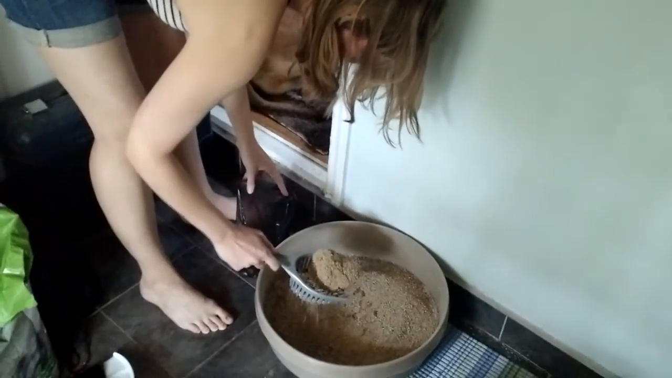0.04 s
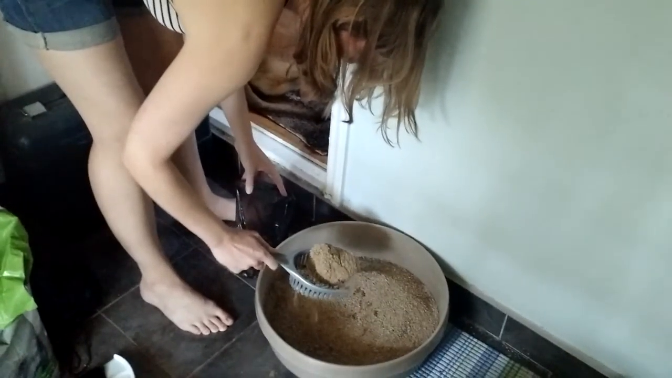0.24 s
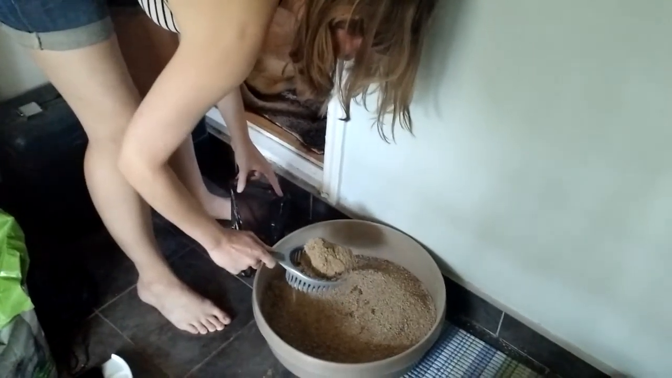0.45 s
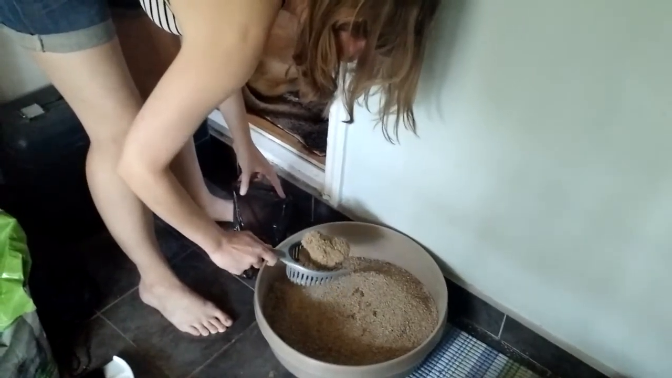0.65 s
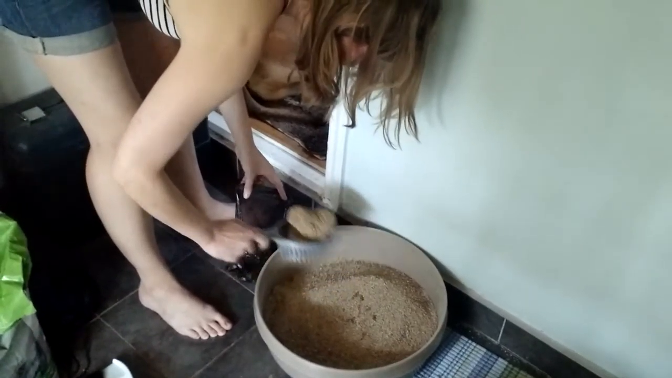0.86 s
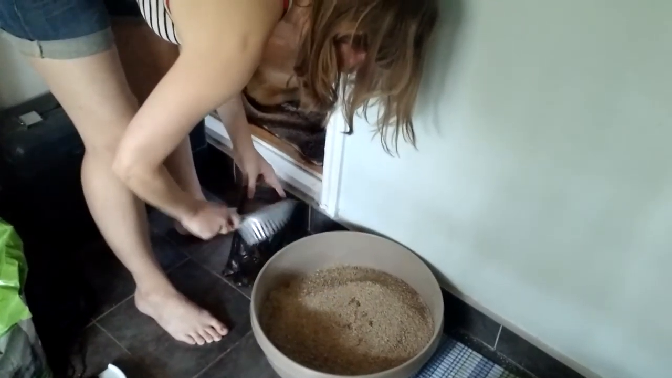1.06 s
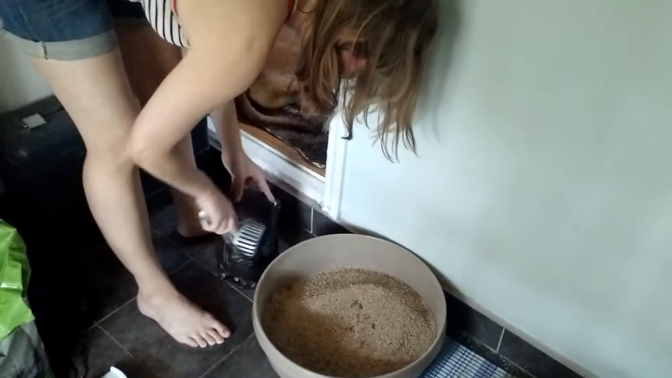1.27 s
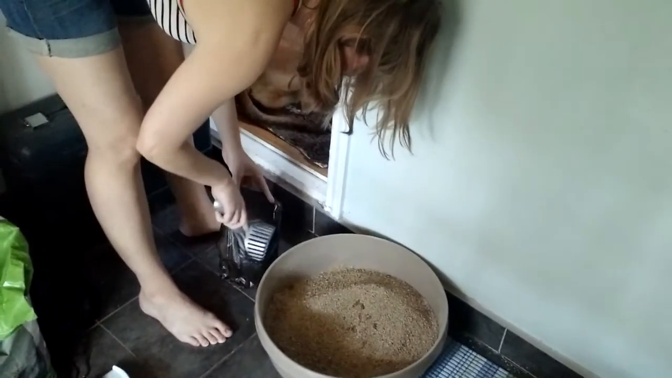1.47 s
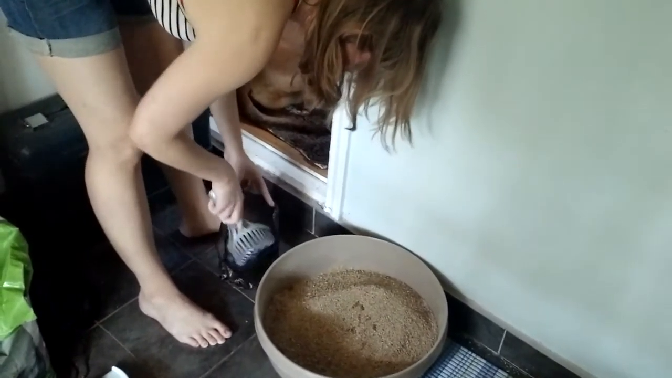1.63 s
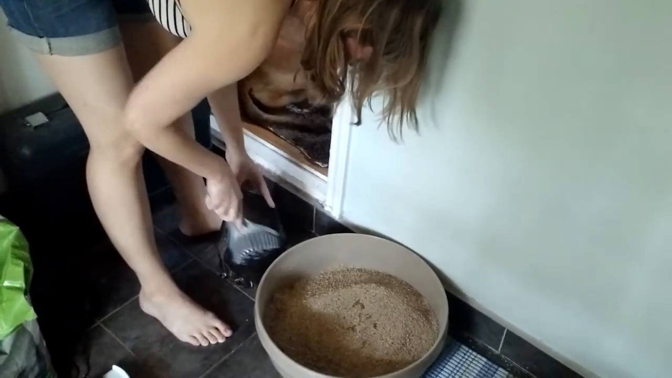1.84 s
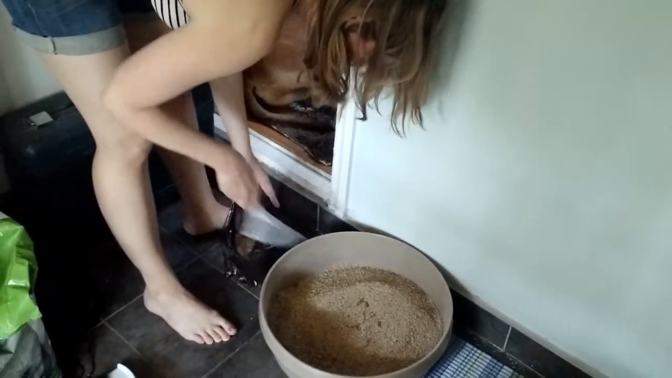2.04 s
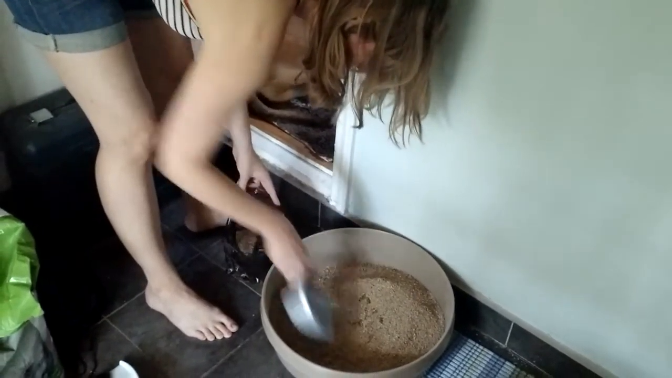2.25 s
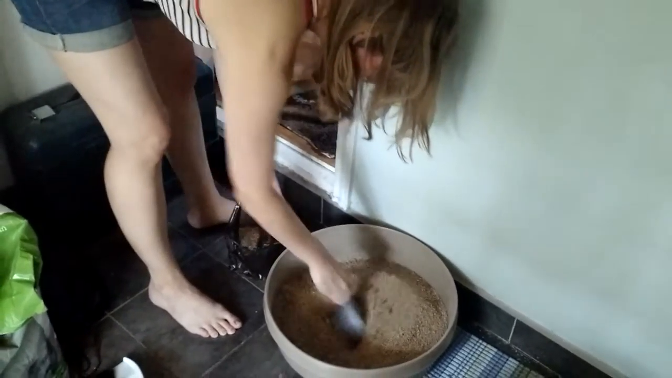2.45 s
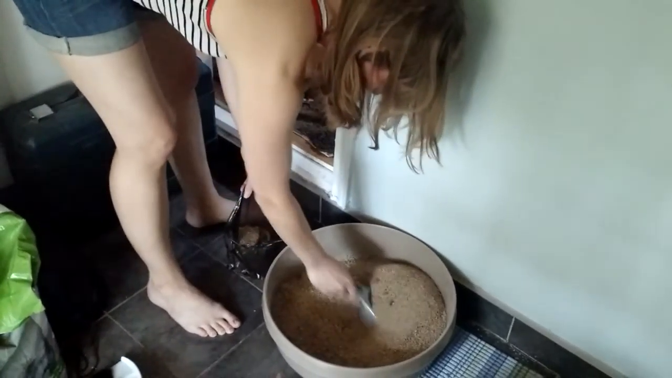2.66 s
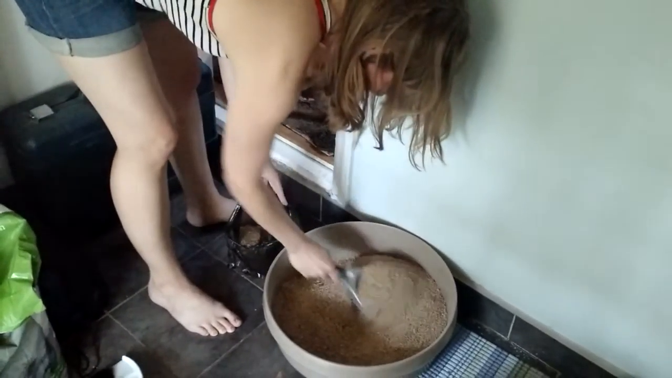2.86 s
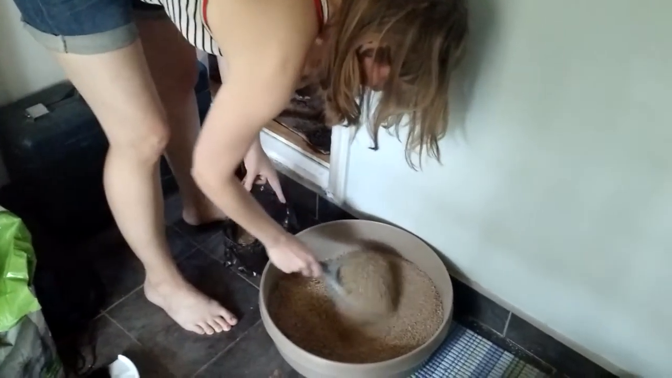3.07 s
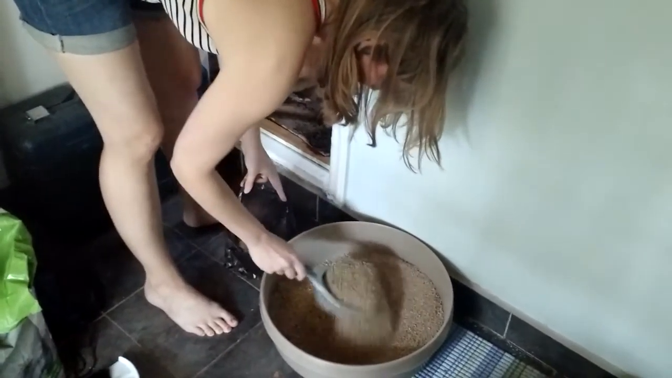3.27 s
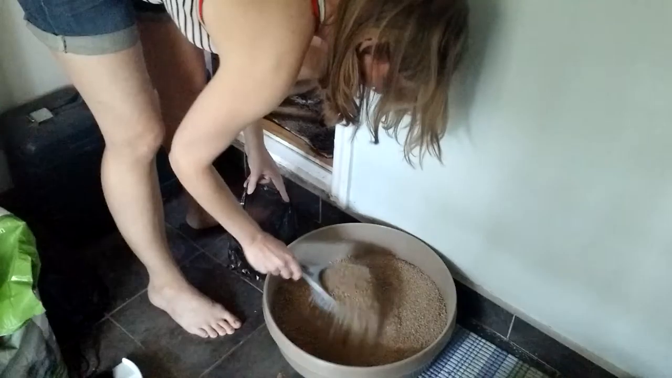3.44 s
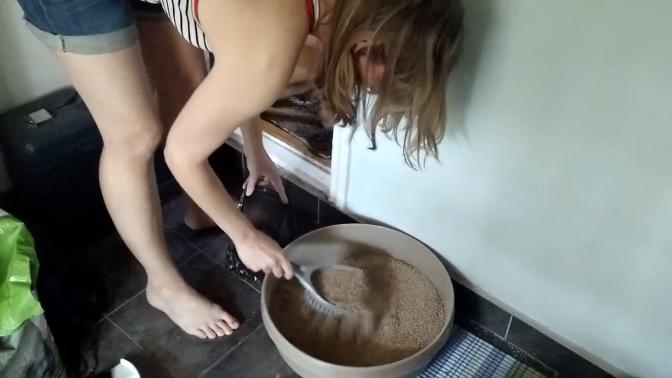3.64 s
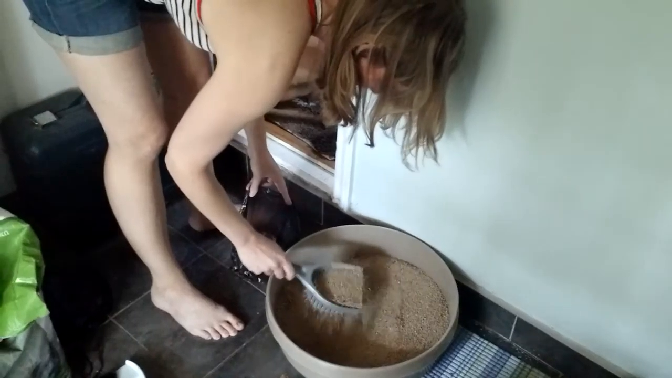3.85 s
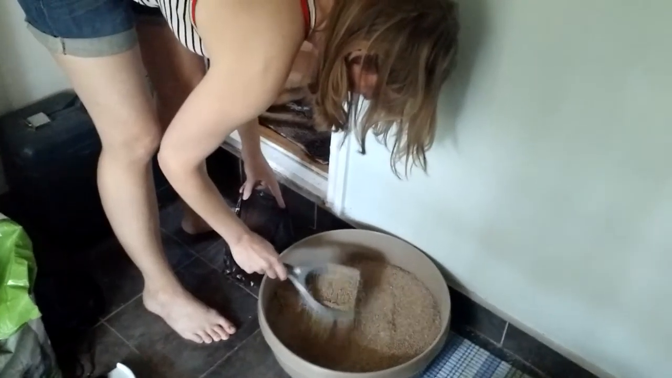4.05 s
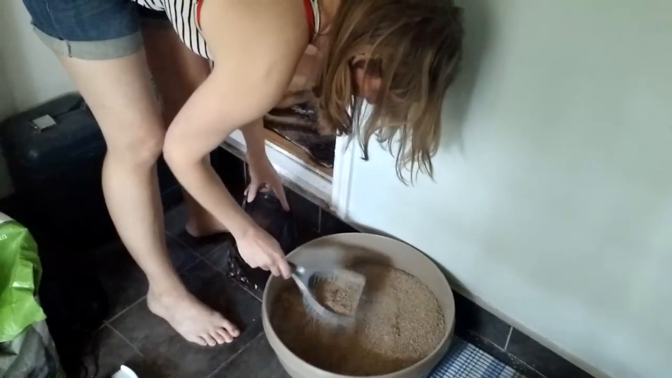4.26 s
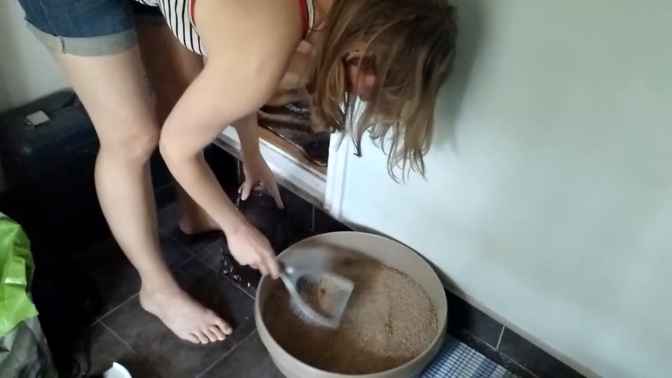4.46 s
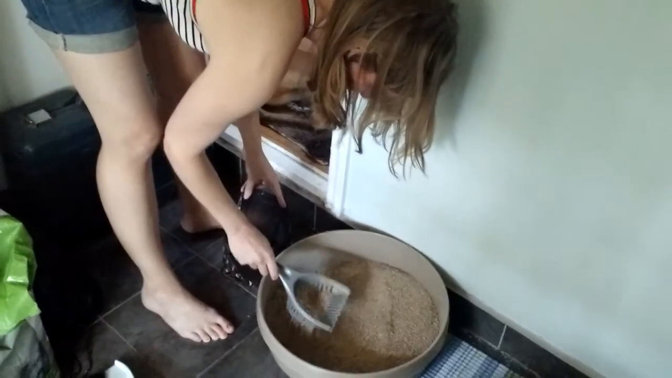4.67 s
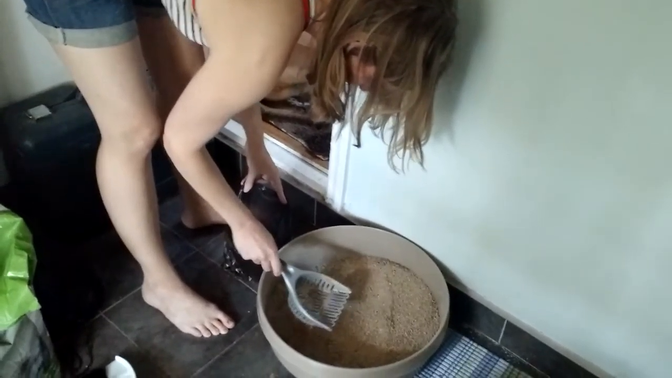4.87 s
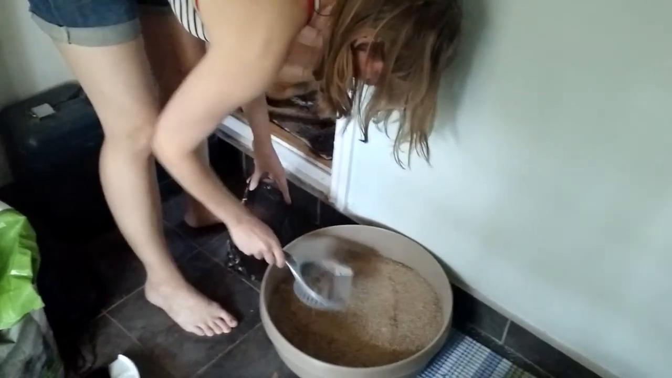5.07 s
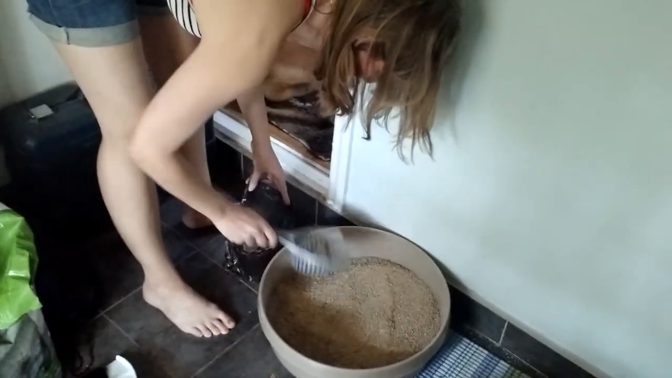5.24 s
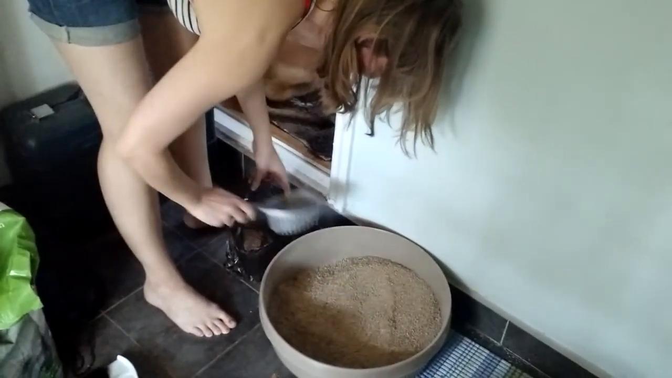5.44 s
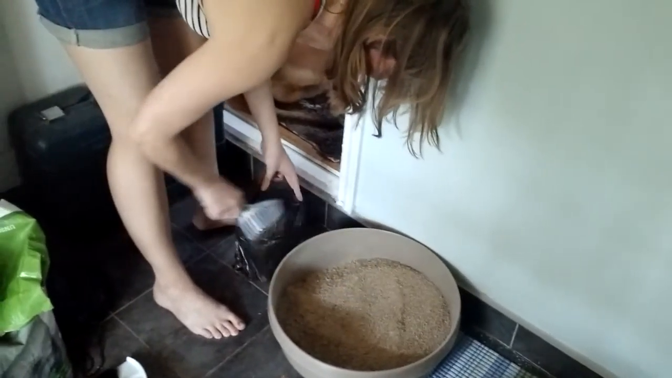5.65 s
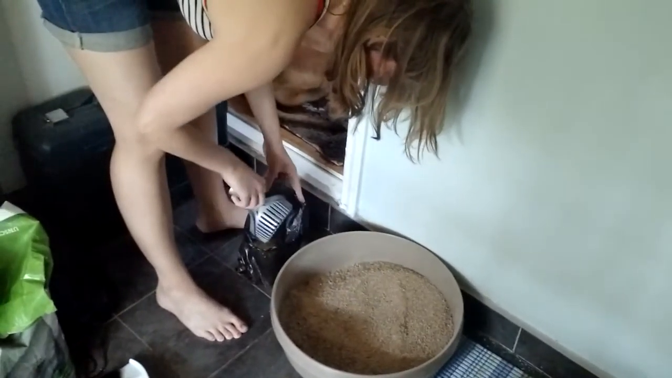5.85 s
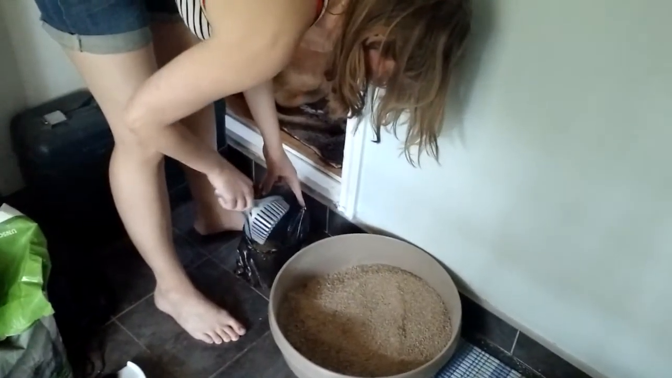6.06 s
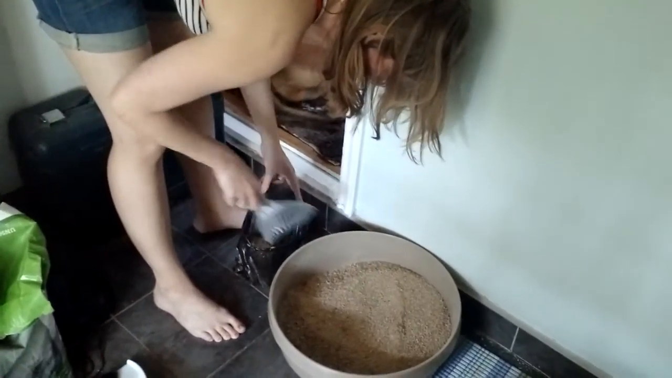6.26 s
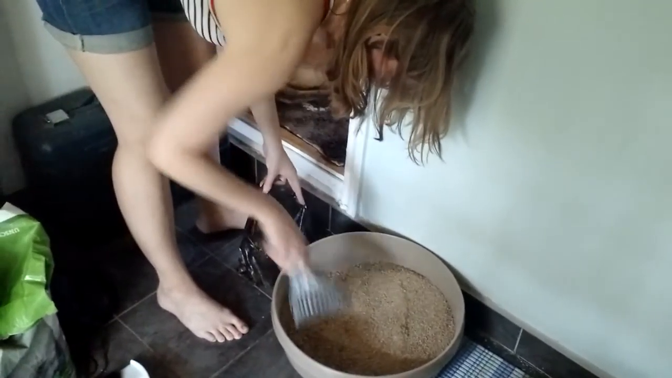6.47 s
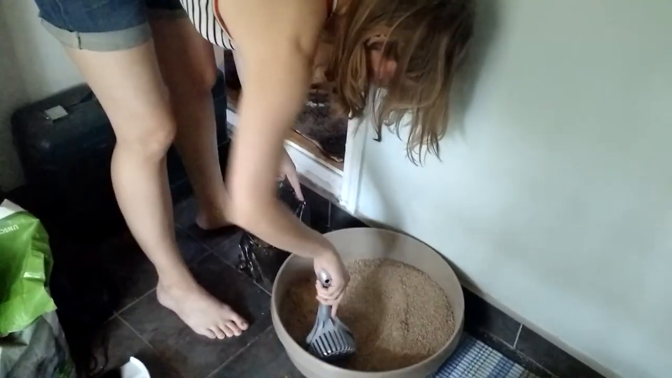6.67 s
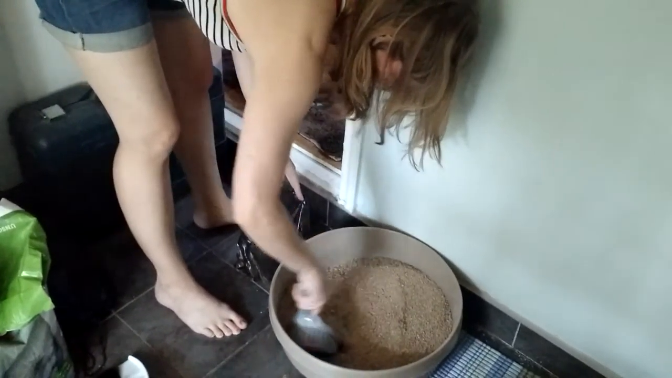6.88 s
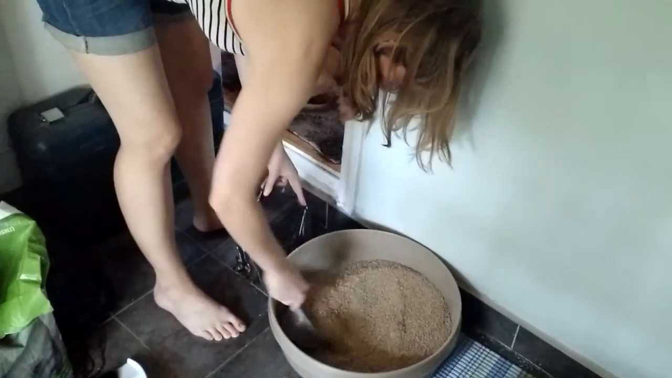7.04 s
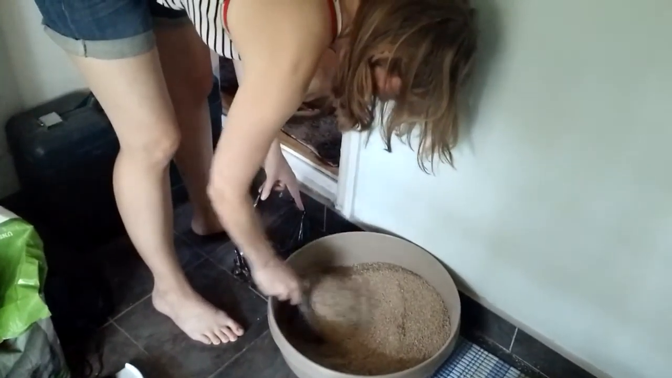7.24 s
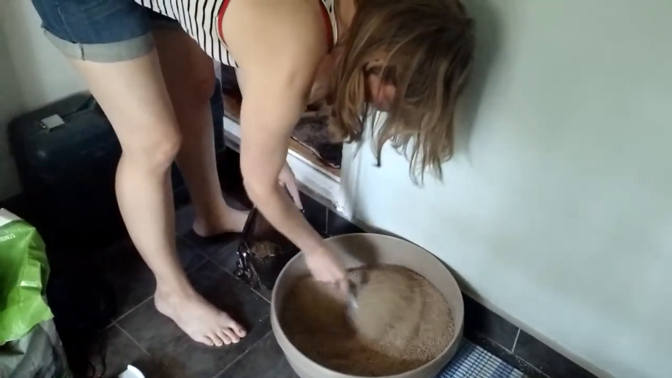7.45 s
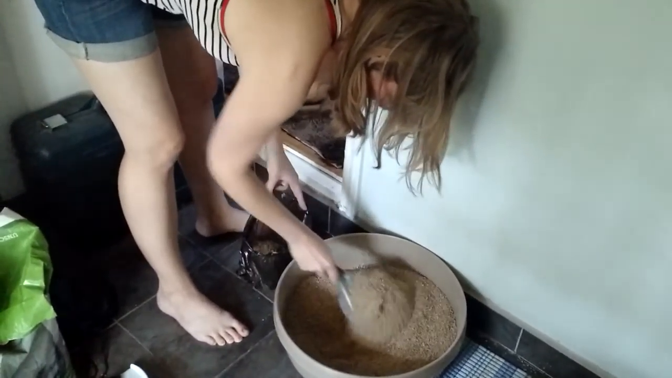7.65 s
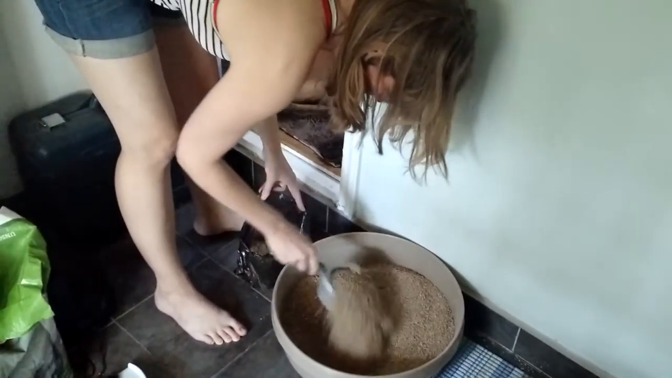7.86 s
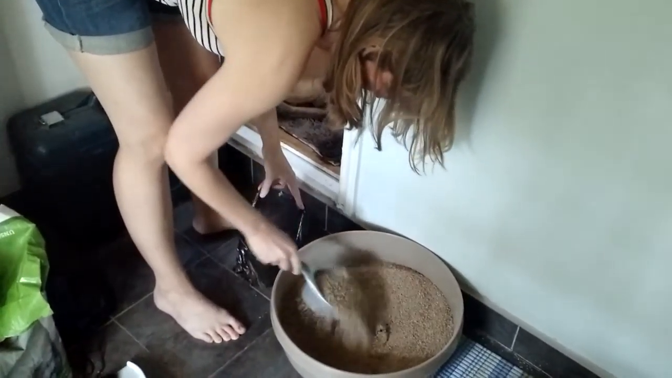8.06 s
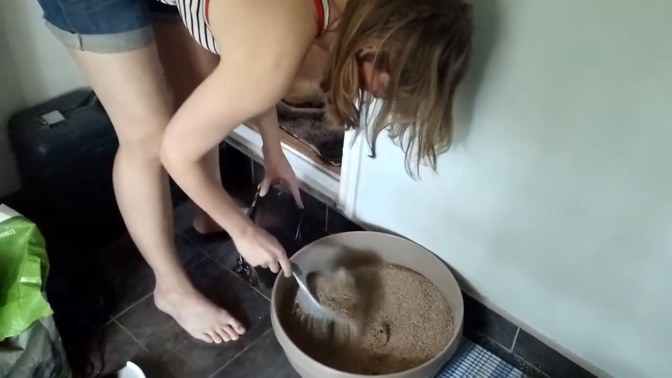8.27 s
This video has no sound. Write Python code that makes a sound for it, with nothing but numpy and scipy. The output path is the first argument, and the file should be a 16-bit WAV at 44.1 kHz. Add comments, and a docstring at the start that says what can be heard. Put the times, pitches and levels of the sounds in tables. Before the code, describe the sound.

Close stereo view of cat litter being scooped in a small room. Fine grit trickles, then a load slides into a bag with a swelling rush, followed by quick shakes. The scoop knocks the plastic basin and digs with a crunch, sifts in rhythmic swishes, empties again more softly, then knocks and scrapes the basin longer and more hollowly. Faint low air rumble and slight hiss lie underneath.

```python
"""Grit trickles throughout over soft air rumble and port self-noise in a small room: filtered chance clicks.
At 1 s and again at 5.4 s litter slides off a slotted scoop into a bag, as swelling noise; from 1.5 s and
3.4 s shakes of the scoop give surges of grit, as does its entry into the litter at 2.26 s. From 2.1 s and
6.5 s the scoop knocks a round plastic basin and rakes its bottom, driving a bank of decaying modes that hum.
Two microphone ports, each subtracted from the other after a short delay, give the stereo picture."""
import sys
import numpy as np
from scipy import signal
from scipy.fft import rfft, irfft, next_fast_len
from scipy.io import wavfile

SR = 44100
rng = np.random.default_rng(int(sys.argv[2]) if len(sys.argv) > 2 else 0)


def unload_audio(sound):
    """Save the sound as a 16-bit wav file, at the path given as the first command line argument."""
    columns = np.transpose(np.atleast_2d(sound))
    # keep every value between -1 and 1, then stretch to whole-number steps
    steps = np.round(np.clip(columns, -1, 1) * 32767)
    wavfile.write(sys.argv[1], SR, steps.astype(np.int16))


N = 366471
SIZE = next_fast_len(N + SR // 2, True)   # transform length, with room for the reverberant tail
HZ = np.maximum(np.arange(SIZE // 2 + 1) * SR / SIZE, 1)

# All levels are relative, ahead of the room and the subtraction at the ports.
# grit trickling through the slots and settling: t/s, grit level/dB, weight on basin or bag level/dB
TRICKLE = [(0.0, -71, -66), (0.25, -66, -69), (0.35, -58.5, -65.5), (0.49, -73, -68.5), (0.74, -66.5, -70),
           (0.9, -58.5, -62.5), (2.05, -62.5, -66.5), (2.24, -70, -69), (3.05, -62.5, -69.5),
           (3.24, -51.5, -59), (3.33, -60.5, -64.5), (3.87, -58.5, -65), (4.2, -55, -64.5),
           (4.86, -62.5, -65.5), (5.09, -73, -68.5), (5.44, -60, -62.5), (6.04, -56, -59.5),
           (6.15, -63.5, -68.5), (6.19, -59, -60.5), (6.23, -62, -60.5), (6.5, -73, -72),
           (7.55, -59.5, -62.5), (7.66, -60, -57), (7.87, -58, -69), (8.01, -58.5, -59.5),
           (8.22, -58.5, -61.5), (8.31, -64, -59)]
# scoop knocks and scuffs on the basin: t/s, level/dB, centre of the ringing region f/Hz, its width/octave, rise/s
KNOCKS = [(2.106, -61, 1630, 1.6, 0.0015), (2.265, -47, 3800, 0.92, 0.0011), (2.361, -25, 1580, 0.29, .014),
          (2.462, -22, 1430, 0.39, 0.0011), (2.681, -57, 3500, 1.9, 0.00091),
          (2.783, -45, 1600, 0.29, 0.0011), (2.845, -47.5, 3000, 1.7, 0.0022),
          (3.575, -49.5, 1500, 1.4, 0.0047), (6.5282, -22.5, 775, 0.31, 0.0046),
          (6.5277, -25, 4100, 0.34, 0.0025), (6.598, -35.5, 965, 1.03, 0.021),
          (6.689, -29, 960, 0.26, 0.012), (6.757, -37.5, 457, 0.62, 0.0048), (7.196, -32, 543, 1.2, 0.0017),
          (7.225, -30, 3800, 0.63, 0.0087), (7.313, -33.5, 3680, 0.57, 0.0046),
          (8.011, -49.5, 3500, 1, 0.0022)]
# litter crushed in the basin: f/Hz, spectral level/dB per Hz
CRUSH_COLOUR = [(130, -32), (250, -11), (450, 2), (800, -4.5), (1200, -2.5), (1700, 1.5), (2500, -3),
                (3800, -10.5), (6000, -9), (8000, -16.5), (15000, -31)]


def from_db(db):
    """Amplitude ratio of a level: twenty decibels to a factor of ten."""
    return 10 ** (np.asarray(db) / 20)


def rms_one(x):
    """Normalization to unit mean power."""
    return x / np.sqrt(np.mean(x ** 2) + 1e-20)


def in_time(rows):
    """Linear interpolation of each column over time."""
    s, *columns = np.transpose(rows)
    return [np.interp(np.arange(N) / SR, s, column) for column in columns]


def over_hz(rows):
    """Interpolation of each column over logarithmic frequency."""
    hz, *columns = np.transpose(rows)
    return [np.interp(np.log(HZ), np.log(hz), column) for column in columns]


def filtered(x, response):
    """Convolution theorem: a linear filter multiplies the spectrum by its frequency response."""
    return irfft(rfft(x, SIZE) * response, SIZE)[..., :N]


def coloured(x, spectrum):
    """Spectral shaping to unit mean power, with a steep fall below the first point."""
    skirt = np.minimum(HZ / spectrum[0][0], 1) ** 2
    return rms_one(filtered(x, skirt * from_db(over_hz(spectrum)[0])))


def together(*levels):
    """Incoherent superposition: unrelated motions add in power."""
    return np.sqrt(sum(level ** 2 for level in levels))


def drift(rate_hz):
    """Low-pass noise: two equal real poles leave a slow random fluctuation of unit rms."""
    step = 40   # the fluctuation is computed at every 40th sample
    pole = np.exp(-2 * np.pi * rate_hz * step / SR)
    noise = rng.standard_normal(N // step + 2002)
    slow = signal.lfilter([1], [1, -2 * pole, pole * pole], noise)[2000:]   # settled part
    return np.interp(np.arange(N) / step, np.arange(len(slow)), rms_one(slow))


def hush():
    """Stationary noise: air rumble and port self-noise, independent at the two ports."""
    # background noise: f/Hz, spectral level/dB per Hz
    hush_colour = [(6, -4), (20, 0.5), (36, -7.5), (45, -12), (58, -8.5), (80, -18), (130, -19), (200, -22),
                   (400, -23.5), (800, -33), (2000, -48.5), (3800, -51), (6000, -38), (9000, -41),
                   (15000, -39.5)]
    return from_db(-52) * coloured(rng.standard_normal((2, N)), hush_colour)


def grains(per_s, spread_db, clump_db):
    """Shot noise: random clicks of uneven size in clumps; one row common to both ports, one for each."""
    heights_db = spread_db * np.minimum(rng.exponential(1, N), 5)
    sizes = from_db(heights_db) * rng.choice([-1, 1], (3, N))
    struck = rng.random(N) < per_s / SR
    return sizes * struck * from_db(clump_db * drift(13))


def grit():
    """Dense shot noise: thousands of grains a second, the finest hissing above the rest."""
    # pattering grains: f/Hz, spectral level/dB per Hz
    grit_colour = [(1200, -20), (2200, -21.5), (3200, -3), (4500, -0.5), (5300, 4), (6300, 0.5), (7300, -3),
                   (8500, -5.5), (10500, -7), (13000, -7.5), (15000, -13)]
    dust_above_hz = 8790
    # fine dust relative to the grit, in dB
    trickle_dust_db, surge_dust_db, pour_dust_db, dig_dust_db = -3.5, -4, -2, -8

    trickle, surging = from_db(in_time(TRICKLE)[0]), surges()
    poured, dug = pours()[0], digs()[0]
    coarse_level = together(trickle + surging, poured, dug)
    airy_dust = from_db(trickle_dust_db) * trickle + from_db(surge_dust_db) * surging
    dust_level = together(airy_dust, from_db(pour_dust_db) * poured, from_db(dig_dust_db) * dug)

    patter = coloured(grains(16000, spread_db=1.0, clump_db=1.24), grit_colour)
    dust = signal.sosfilt(signal.butter(4, dust_above_hz, "high", fs=SR, output="sos"), patter)
    coarse = signal.sosfilt(signal.butter(4, dust_above_hz, fs=SR, output="sos"), patter)
    return coarse_level * rms_one(coarse) + dust_level * rms_one(dust)


def rake():
    """Frictional excitation: crushed coarser grains ring the basin unevenly, or rustle the bag instead."""
    # place of the scoop: t/s, share over the bag (1 bag, 0 basin)
    over_bag = [(0, 1), (2.0, 1), (2.2, 0), (5.2, 0), (5.4, 1), (6.3, 1), (6.45, 0), (8.31, 0)]
    # litter rustling the bag: f/Hz, spectral level/dB per Hz
    bag_colour = [(200, -6.5), (400, 0), (900, -5), (1500, 1.5), (2200, -0.5), (4000, -18.5), (8000, -7),
                  (15000, -14.5)]
    surge_weight_db, ring_db = -20, -11.5
    trickle_rasp_db, pour_rasp_db = -5.5, -3.5   # rasp of the slotted edge relative to the weight
    rasp_hz, rasp_width_hz = 3640, 2180

    light = from_db(in_time(TRICKLE)[1]) + from_db(surge_weight_db) * surges()
    poured = pours()[1]
    pressure, scrape = digs()[1:]
    level = together(light, poured, pressure)
    edge_level = together(from_db(trickle_rasp_db) * light, from_db(pour_rasp_db) * poured, scrape)

    bag = in_time(over_bag)[0]
    crushed = grains(5000, spread_db=0.5, clump_db=2.15)
    band = [rasp_hz - rasp_width_hz / 2, rasp_hz + rasp_width_hz / 2]
    rasp = rms_one(signal.sosfilt(signal.butter(2, band, "band", fs=SR, output="sos"), crushed))
    body = (1 - bag) * coloured(crushed, CRUSH_COLOUR) + bag * coloured(crushed, bag_colour)
    # each mode is driven by the same grains with its own slow fluctuation
    ringing = rms_one(basin(lambda hz: crushed[0] * from_db(4.5 * drift(8))))
    hum = from_db(ring_db) * level * (1 - bag) * ringing
    return level * body + edge_level * rasp, hum


def pours():
    """Granular flow: each slide into the bag swells, holds and ebbs exponentially, in grit and in weight."""
    # litter sliding off the scoop: t/s, rise/s, hold/s, grit level/dB, weight level/dB
    slides = [(0.96, 0.1, 0.044, -38, -42.5), (1.068, 0.075, 0.0085, -35, -38),
              (1.287, 0.052, .01, -44.5, -51), (1.411, 0.073, 0.35, -47.5, -52.5),
              (5.432, 0.13, 0.022, -43, -48), (5.577, 0.055, 0.018, -43.5, -45),
              (5.7, 0.062, 0.035, -49.5, -57.5), (6.235, .12, .02, -56, -59)]
    grit_fall_db_per_s, weight_fall_db_per_s = 90, 76
    t, grit_power, weight_power = np.arange(N) / SR, 0, 0
    for s, rise_s, hold_s, grit_db, weight_db in slides:
        swell = np.sin(np.pi / 2 * np.clip((t - s) / rise_s, 0, 1)) ** 2
        after_s = np.clip(t - s - rise_s - hold_s, 0, 1)
        grit_level = swell * from_db(grit_db - grit_fall_db_per_s * after_s)
        weight_level = swell * from_db(weight_db - weight_fall_db_per_s * after_s)
        grit_power = grit_power + grit_level ** 2
        weight_power = weight_power + weight_level ** 2
    return np.sqrt(grit_power), np.sqrt(weight_power)


def surges():
    """Amplitude modulation: each surge swells fast and ebbs more slowly along a skewed half sine."""
    # shakes of the scoop, and at 2.26 s the spray of grit as it enters the litter: t/s, peak level/dB, length/s
    bursts = [(1.47, -55, 0.048), (1.55, -51, .05), (1.642, -44, 0.062), (1.732, -48, .06),
              (1.82, -51, 0.065), (2.259, -44, 0.06), (3.353, -56.5, 0.1), (3.435, -55, 0.1),
              (3.555, -50, .085), (3.668, -49.5, 0.085), (3.778, -52.5, 0.061), (3.885, -49.5, 0.077),
              (3.982, -54.5, 0.059), (4.08, -51.5, 0.081), (4.18, -57, 0.065), (4.267, -50.5, 0.071),
              (4.368, -59, 0.054), (4.454, -58, 0.08), (4.535, -59, 0.072), (4.603, -58.5, 0.052),
              (6.34, -56, .04), (8.262, -54, 0.082)]
    peak_share = 0.38   # part of the length spent rising
    out, t = np.zeros(N), np.arange(N) / SR
    for s, peak_db, length_s in bursts:
        span = slice(round(s * SR), round((s + length_s) * SR))
        phase = np.interp(t[span] - s, [0, peak_share * length_s, length_s], [0, np.pi / 2, np.pi])
        out[span] += from_db(peak_db) * np.sin(phase)
    return out


def basin(force_on):
    """Modal superposition: damped resonators in parallel, each driven by its own push force_on(hz)."""
    # modes of the plastic basin: f/Hz, level/dB, 60 dB decay time/s
    modes = [(337, 8.5, 0.12), (455, 4, 0.27), (564, 2.5, 0.17), (772, 1, 0.052), (922, -3.5, 0.1),
             (1090, -9, 0.14), (1397, -6, 0.089), (1521, -28, 0.021), (1640, 1, 0.042), (2010, -4, 0.075),
             (2244, 8.5, 0.073), (3270, 8.5, 0.023), (3700, 4.5, 0.021), (4040, 0, 0.079),
             (4570, -3, 0.022)]
    out = 0
    for hz, level_db, t60_s in modes:
        radius = from_db(-60 / (t60_s * SR))
        angle = 2 * np.pi * hz / SR
        push = from_db(level_db) * force_on(hz) + 1e-18   # tiny offset keeps the filter out of denormals
        recursion = [1, -2 * radius * np.cos(angle), radius * radius]
        out = out + signal.lfilter([0, np.sin(angle)], recursion, push)
    return out


def strokes(decay_s, gains):
    """Transient envelope of all knocks: each rises linearly in its own time, then decays exponentially."""
    out, t = np.zeros(N + SR), np.arange(SR // 5) / SR
    for (s, level_db, hz, octaves, rise_s), gain in zip(KNOCKS, gains):
        shape = np.minimum(t / rise_s, np.exp(-(t - rise_s) / decay_s))
        out[round(s * SR):][:len(t)] += gain * from_db(level_db) * shape
    return out[:N]


def knocks():
    """Impact excitation: sudden blows crack, all crunch the litter and scuff the modes near their region."""
    crack_s, crack_db = 0.0005, -2
    crunch_t60_s, crunch_db = 0.13, -14.5
    scuff_s, ring_db = 0.0067, -29.5
    region_hz, octaves, rise_s = np.transpose(KNOCKS)[2:]
    suddenness = crack_s / (crack_s + rise_s)
    crack = from_db(crack_db) * strokes(crack_s, suddenness)
    # ln(1000) time constants make a 60 dB decay
    crush = from_db(crunch_db) * strokes(crunch_t60_s / np.log(1000), np.ones(len(KNOCKS)))
    crunch = (crack + crush) * coloured(rng.standard_normal((3, N)), CRUSH_COLOUR)
    rough = rng.choice([-1, 1], N)

    def scuff(hz):
        """Selective excitation: a bell over log frequency weights the rough push on a mode."""
        nearness = np.exp(-(np.log2(hz / region_hz) / octaves) ** 2)
        return rough * strokes(scuff_s, nearness)
    return crunch, from_db(ring_db) * basin(scuff)


def digs():
    """Contact pressure: grit, pressure and rasp follow each dig through the basin; silent between digs."""
    # one curve a dig: t/s, level of grit thrown up/dB, pressure on the bottom level/dB
    dig_curves = [
        [(2.27, -71, -66), (2.31, -42, -50), (2.35, -40.5, -35), (2.43, -40.5, -38.5), (2.48, -50, -38),
         (2.53, -49, -43), (2.74, -58.5, -58.5), (2.83, -50.5, -49), (3.05, -65, -68)],
        [(6.55, -75, -66), (6.57, -58, -43.5), (6.62, -43.5, -40.5), (6.66, -53, -44), (6.71, -44.5, -42),
         (6.8, -47, -41), (6.91, -42.5, -42.5), (7.0, -39.5, -38), (7.1, -50, -44.5), (7.16, -48, -43.5),
         (7.22, -44, -37.5), (7.28, -46, -40.5), (7.34, -46, -40), (7.42, -45, -46.5), (7.53, -61, -67.5)],
    ]
    rasp_start_db = -9   # relative to the pressure
    rasp_growth_db_per_s = 7   # the deeper into a dig, the more of the edge scrapes
    t, out = np.arange(N) / SR, 0
    for rows in dig_curves:
        grit_db, pressure_db = in_time(rows)
        start, end = rows[0][0], rows[-1][0]
        into_dig_s = np.clip(t - start, 0, end - start)
        rasp_db = pressure_db + rasp_start_db + rasp_growth_db_per_s * into_dig_s
        active = (t >= start) & (t < end)
        out = out + active * from_db([grit_db, pressure_db, rasp_db])
    return out


def at_ports(spread, ring):
    """Spatial coherence: wide litter shares only its lows, the basin reaches both ports; the room reverberates."""
    # coherence of the ports: f/Hz, share of power alike at both (0-1)
    alike = [(150, .85), (700, .8), (1200, .5), (2000, .05), (8000, .03)]
    room_t60_s, room_db = 0.25, -7
    share = np.clip(over_hz(alike)[0], 0, 1)
    t = np.arange(SR // 2) / SR
    tail = rng.standard_normal((3, len(t))) * from_db(-60 * t / room_t60_s)
    unit_tail = tail / np.sqrt(np.sum(tail ** 2, axis=1, keepdims=True))
    room = from_db(room_db) * rfft(unit_tail, SIZE)
    # first row common to both ports, the others each port's own
    parts = filtered(spread, (1 + room) * np.sqrt([share, 1 - share, 1 - share]))
    ring_room = np.sqrt(share) * room[0] + np.sqrt(1 - share) * room[1:]
    return parts[0] + parts[1:] + filtered(ring, 1 + ring_room)


def scene():
    """Linear superposition of all sources at the two microphone ports."""
    crushed, hum = rake()
    crunch, ring = knocks()
    return at_ports(grit() + crushed + crunch, hum + ring) + hush()


def record(dry):
    """Pressure-gradient principle: subtracting the delayed other port combs what the ports share."""
    # f/Hz, cross-feed into left (0-1), into right (0-1), shortening of left delay/ms, left minus right level/dB
    cross = [(30, .12, .12, 0, -1), (60, .3, .3, 0, 0), (200, .15, .15, 0, 0), (900, 1, 1, 0, 0),
             (4300, 1, 1, 0, 0), (5300, .6, .3, .01, -1), (7000, .7, .15, .018, -3),
             (9500, .6, .12, .022, -4), (11000, .3, .08, .022, -3), (13000, .3, .05, .022, 0),
             (15000, .2, .05, .022, 1)]
    delay_ms, cutoff_hz = 0.375, 15400
    to_left, to_right, shorter_ms, balance_db = over_hz(cross)
    a, b = rfft(dry, SIZE)
    delayed_b = b * np.exp(-2j * np.pi * HZ * (delay_ms - shorter_ms) / 1000)
    delayed_a = a * np.exp(-2j * np.pi * HZ * delay_ms / 1000)
    left = a - np.clip(to_left, 0, 1) * delayed_b
    right = b - np.clip(to_right, 0, 1) * delayed_a
    # undo the power that the cross-feed adds, then balance the sides
    left = left * from_db(balance_db / 2) / np.sqrt(1 + to_left ** 2)
    right = right * from_db(-balance_db / 2) / np.sqrt(1 + to_right ** 2)
    pair = irfft(np.array([left, right]), SIZE)[:, :N]
    low_pass = signal.ellip(12, .5, 70, cutoff_hz, fs=SR, output="sos")
    return signal.sosfilt(low_pass, pair)


dry = scene()
out = record(dry)
unload_audio(out)
```